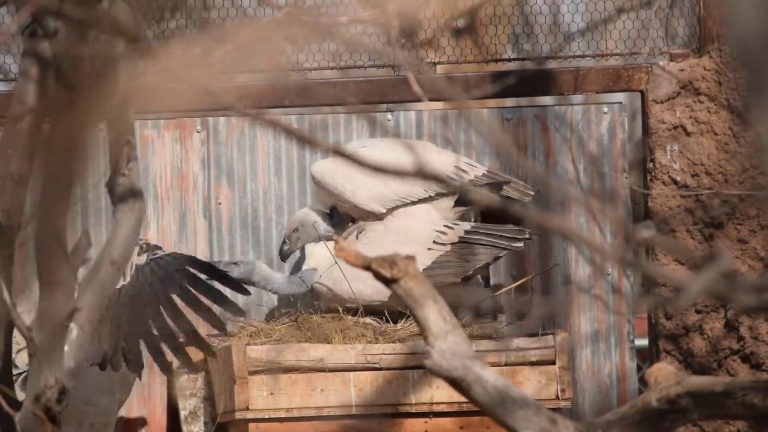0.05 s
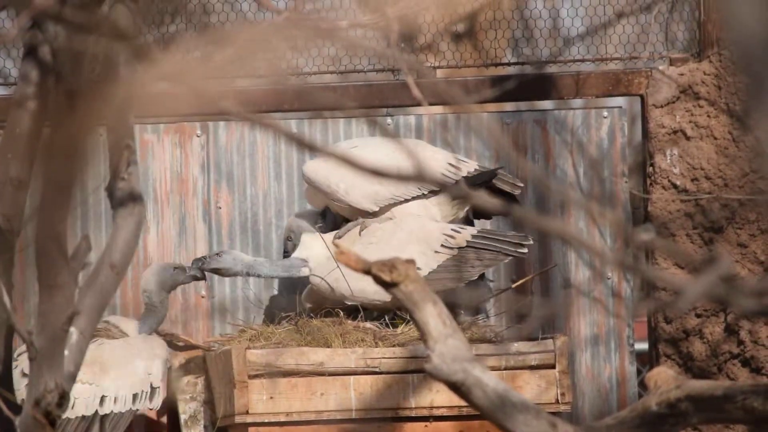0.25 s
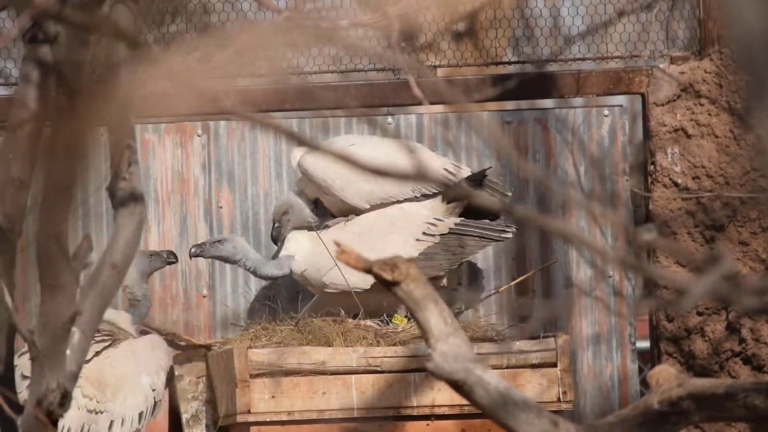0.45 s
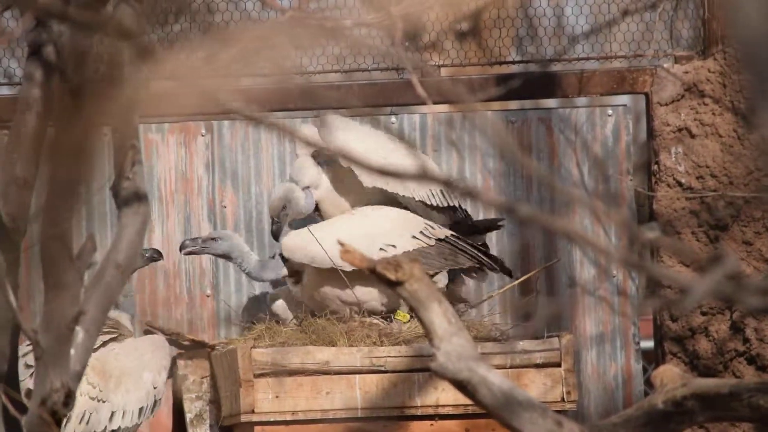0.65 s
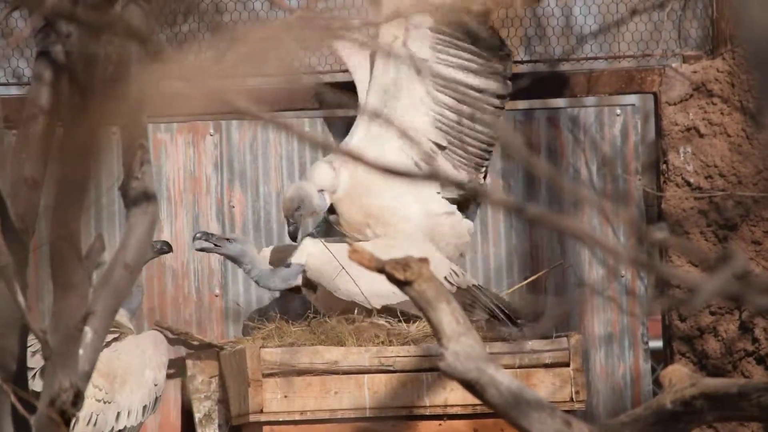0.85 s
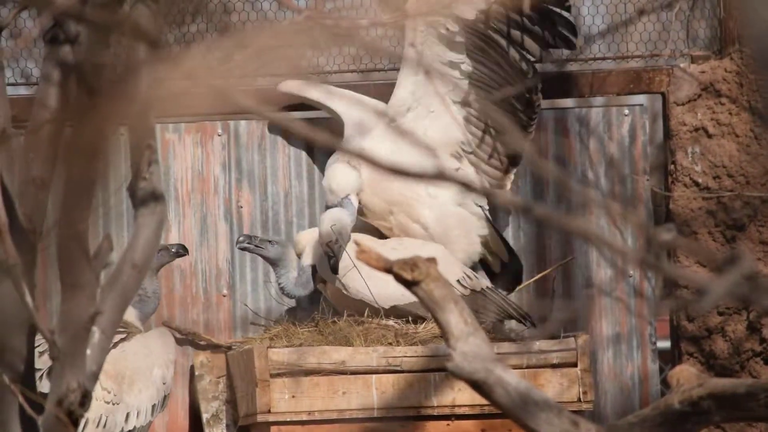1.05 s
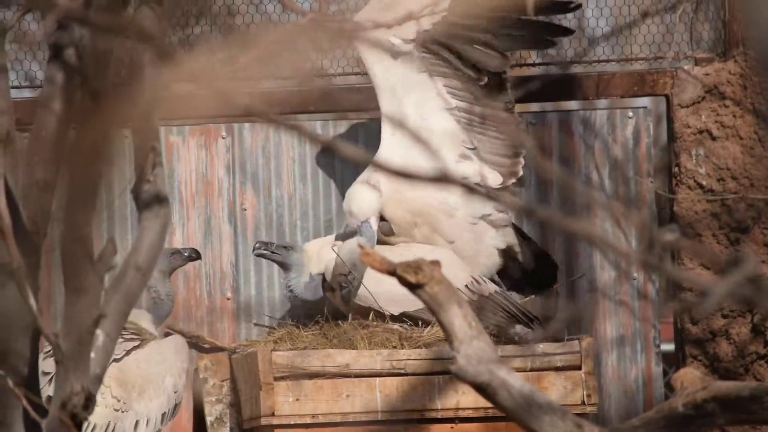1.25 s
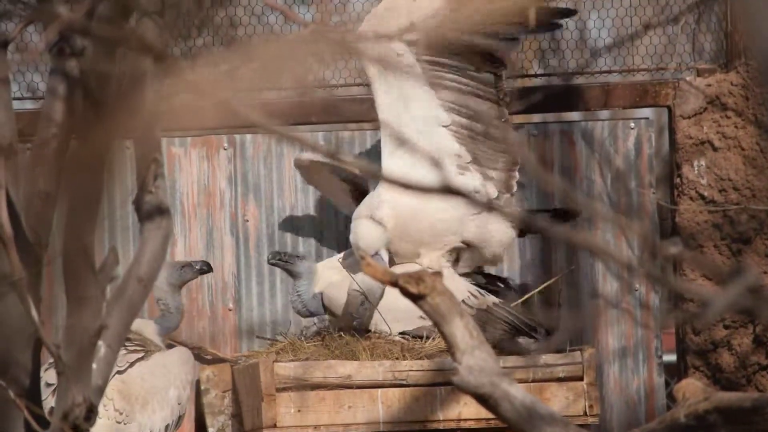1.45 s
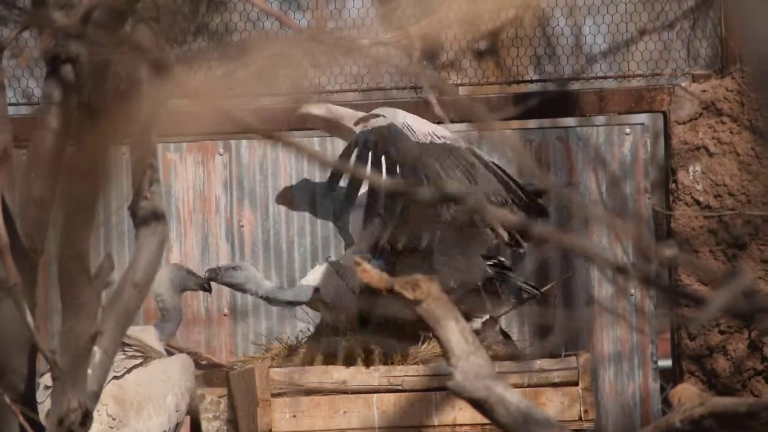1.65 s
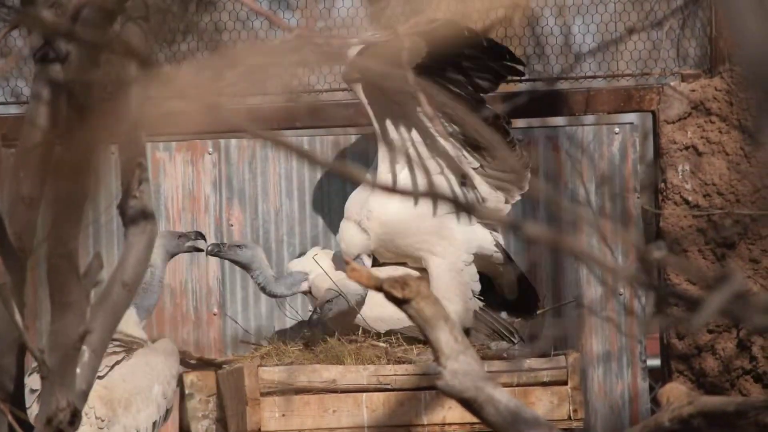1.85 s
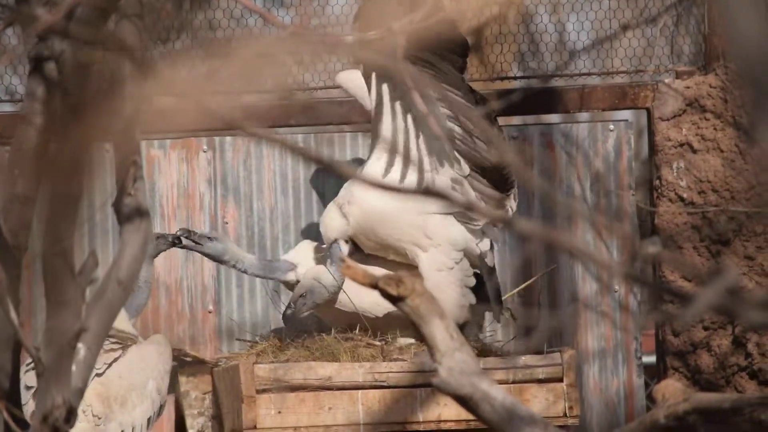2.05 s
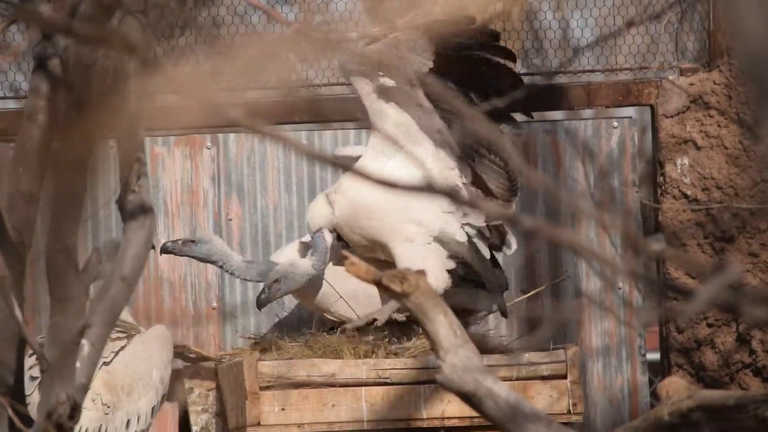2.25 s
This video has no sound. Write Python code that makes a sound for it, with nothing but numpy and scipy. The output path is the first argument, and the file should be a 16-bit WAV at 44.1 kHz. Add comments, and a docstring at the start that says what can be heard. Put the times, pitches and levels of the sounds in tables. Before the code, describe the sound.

Vultures give harsh, hoarse, hissing calls, with faint wing swishes and small birds chirping.

```python
"""Vultures squabbling in an aviary

Six hoarse calls from a nest box: ragged airflow through throat resonances, with hiss and wavering
whistles on top and short squeals where the voice catches a clear pitch. Wings swish, small birds
chirp all around, and a sheet-metal wall answers over a low outdoor rumble."""
import sys
import numpy as np
from scipy import signal
from scipy.fft import rfft, irfft, next_fast_len
from scipy.io import wavfile
from scipy.ndimage import uniform_filter1d, map_coordinates

SR = 44100
rng = np.random.default_rng(int(sys.argv[2]) if len(sys.argv) > 2 else 0)


def bounce(signal):
    """Save signal as a 16-bit WAV file at the path given by the first command-line argument."""
    frames = np.transpose(np.atleast_2d(signal))
    limited = np.clip(frames, -1, 1)
    pcm = np.round(limited * 32767).astype(np.int16)
    wavfile.write(sys.argv[1], SR, pcm)


N = 101429
FLUTTER_HZ, TRILL_HZ = 153.8, 300  # random modulation rates


def amp(db):
    """dB to gain."""
    return 10 ** (np.asarray(db) / 20)


def unit(x):
    """Scale to rms 1."""
    return x / np.sqrt(np.mean(x ** 2) + 1e-20)


def along(points, hz):
    """Interpolate (f/Hz, value) points on a log axis."""
    f, v = np.transpose(points)
    return np.interp(np.log(hz + 1), np.log(f + 1), v)


def clock():
    """Sample times in s."""
    return np.arange(N) / SR


def phase_of(hz):
    """Running phase in rad."""
    return 2 * np.pi * np.cumsum(hz) / SR


def wobble(hz, size):
    """Smooth random curve, hz knots per second."""
    return map_coordinates(rng.standard_normal(2048), [np.arange(size) * hz / SR], mode="mirror")


def filtered(x, response):
    """Apply the gain response(f/Hz)."""
    m = next_fast_len(N + SR // 4)
    return irfft(rfft(x, m) * response(np.fft.rfftfreq(m, 1 / SR)), m)[..., :N]


def noise(spectrum, patchy_db=3.2):
    """Stereo noise, rms 1, in patches of random gain; wider towards the treble."""
    # stereo width: f/Hz, side over mid/dB
    width = [(100, -33.5), (700, -17), (1500, -17), (4000, -8.5), (9000, -3.5)]
    bins = signal.stft(rng.standard_normal((2, N)), nperseg=512)[2]
    patches = uniform_filter1d(rng.standard_normal(bins.shape[1:]), size=3, axis=0)
    patches = unit(uniform_filter1d(patches, size=7, axis=1))
    mid, side = signal.istft(bins * amp(patchy_db * patches), nperseg=512)[1][:, :N]
    mid = filtered(mid, lambda hz: amp(along(spectrum, hz)))
    side = filtered(side, lambda hz: amp(along(spectrum, hz) + along(width, hz)))
    return unit(np.array([mid + side, mid - side]))


def add(out, start_s, x):
    """Mix x into out at start_s."""
    i = round(start_s * SR)
    x = x[max(-i, 0):max(N - i, 0)]
    out[max(i, 0):][:len(x)] += x


def wheezes(jitter=.005, shimmer_db=2.2):
    """Pinched, shaky whistle heard by its overtones; the pitch arches as it swells."""
    # wheezes: t/s, length/s, fundamental/Hz, level/dB, 5th re 3rd harmonic/dB, pitch arch/ratio
    notes = [(-0.015, 0.06, 1681, -39.5, -49, .22), (.036, 0.025, 1635, -44, -40, 0.13),
             (0.594, 0.091, 1643, -37, -18, 0.0516), (1.649, 0.059, 1630, -44, -12, 0.051)]
    out = np.zeros(N)
    for start_s, length_s, hz, db, upper_db, arch in notes:
        n = int(length_s * SR)
        progress = np.linspace(0, 1, n)
        bend = 1 - arch * (progress - .62) ** 2
        swell = np.abs(np.sin(np.pi * progress ** 1.3)) ** .8
        phase = phase_of(hz * (bend + jitter * wobble(282, n)))
        partials = [(2, -9), (3, 0), (5, upper_db), (6, upper_db - 7), (8, upper_db - 21)]
        tone = sum(amp(db + rel_db + shimmer_db * wobble(FLUTTER_HZ, n)) * np.sin(k * phase)
                   for k, rel_db in partials)
        add(out, start_s, 2 * swell * tone)
    return out


def squeals(jitter=.045, swell_db=6, shimmer_db=6, edge_s=.0048):
    """The voice catches a pitch and swells; roughness shakes pitch and level."""
    # squeals: t/s, length/s, first f/Hz, last f/Hz, level/dB, 3rd harmonic/dB, roughness/0-1
    notes = [(-0.01, 0.05, 931, 902, -37.5, -12, 0.42), (-0.01, 0.05, 1128, 1215, -43, -27, 0.53),
             (-0.01, 0.037, 1850, 1815, -38, -18, 0.22), (-0.01, 0.06, 1480, 1463, -41, -35, 0.75),
             (0.185, 0.036, 1402, 1318, -27, -45, .5), (0.21, 0.054, 1400, 1425, -21, -35, 0.08),
             (0.232, 0.068, 1569, 1640, -29, -30, 0.25), (0.522, 0.011, 1204, 1190, -35.5, -25, 0.65),
             (0.561, .02, 1252, 1325, -33, -15, 0.38), (0.302, 0.038, 1480, 1541, -24.5, -42, 0.06),
             (0.312, 0.055, 936, 952, -28.5, -40, 0.2), (0.365, .112, 957, 957, -39, -32, 0),
             (0.615, 0.053, 1624, 1646, -27, -38, 0), (.648, 0.074, 1910, 2180, -38, -42, 0.25),
             (0.659, 0.118, 1640, 1672, -28.5, -43, 0), (0.676, 0.018, 1649, 1670, -16, -51, 0),
             (0.991, 0.023, 1277, 1286, -32.5, -36, 0.08), (1.036, 0.026, 1363, 1380, -27, -41, 0.34),
             (1.0895, 0.01, 1440, 1500, -17.5, -38, 0), (1.118, 0.025, 1533, 1532, -13.5, -43, 0),
             (1.144, 0.012, 1510, 1580, -17.5, -41, 0.07), (1.154, 0.0059, 1554, 1510, -10, -44, 0),
             (1.175, 0.0059, 1540, 1570, -16, -38, 0.3), (1.349, 0.032, 1293, 1349, -27, -27, 0.48),
             (1.35, 0.029, 1012, 992, -32, -28, 0.2), (1.516, 0.018, 1187, 1280, -38.5, -28, 0.54),
             (1.566, 0.013, 1220, 1260, -34.5, -25, 0.4), (1.612, 0.039, 1297, 1429, -28.5, -18, 0.4),
             (1.662, 0.041, 905, 917, -37, -27, 0.13), (1.871, 0.027, 1447, 1318, -29.5, -18, 0.13),
             (1.706, 0.093, 1605, 1640, -28.5, -42, 0.18), (1.745, 0.036, 2050, 2205, -34.5, -42, .2),
             (1.928, 0.071, 1622, 1624, -21, -46, 0.05), (1.981, 0.0057, 1560, 1560, -24, -39, 0.2),
             (2.166, 0.021, 1027, 1046, -36.5, -25, 0)]
    out = np.zeros(N)
    for start_s, length_s, first_hz, last_hz, db, third_db, rough in notes:
        n = int(length_s * SR)
        t = np.arange(n) / SR
        phase = phase_of(np.linspace(first_hz, last_hz, n) * (1 + jitter * rough * wobble(286, n)))
        partials = [(1, 0), (2, -26.5), (3, third_db), (5, third_db - 28)]
        tone = sum(amp(rel_db) * np.sin(k * phase) for k, rel_db in partials)
        gate = np.sin(np.pi / 2 * np.clip(np.minimum(t, t[::-1]) / edge_s, 0, 1)) ** 2
        level_db = db + swell_db * np.linspace(-.5, .5, n) + shimmer_db * rough * wobble(FLUTTER_HZ, n)
        add(out, start_s, np.sqrt(2) * tone * gate * amp(level_db))
    return out


def rumble(level_db=-40.5):
    """Outdoor background: low rumble and broad noise."""
    # background spectrum: f/Hz, relative level/dB
    spectrum = [(25, -25), (50, -22), (85, -8.5), (130, 0), (160, -5), (220, 4), (270, 1), (340, 5),
                (480, -1.5), (750, 0), (1300, 6), (2200, 0), (3600, 3.5), (4700, -0.5), (6200, -19),
                (10000, -29.5), (15500, -39)]
    return amp(level_db) * noise(spectrum, patchy_db=2)


def chirp(length_s, contour_hz, waver=.022, trill_db=3.2):
    """Raspy whistle curving through three pitches; a thin octave joins below 6 kHz."""
    n = int(length_s * SR)
    progress = np.linspace(0, 1, n)
    arch_hz = np.polyval(np.polyfit([0, .5, 1], contour_hz, 2), progress)
    hz = arch_hz * (1 + waver * wobble(TRILL_HZ, n))
    phase = phase_of(hz)
    tone = np.sin(phase) + amp(-21) * (hz < 6000) * np.sin(2 * phase)
    swell = np.abs(np.sin(np.pi * progress)) ** .5
    return unit(tone * swell * amp(trill_db * wobble(TRILL_HZ, n)))


def flock(per_s=90, centre_hz=3703, base_db=-51.5, spread=.21, sweep=.1684, length_s=.035):
    """Chatter of random chirps around one pitch; flares up and subsides."""
    # flock activity: t/s, gain/dB
    bustle = [(.1, -11), (.17, 4), (.92, -6), (1.01, -6), (1.1, -3), (1.95, -0.5), (2.2, -3)]
    out = np.zeros(N)
    draws = rng.uniform(-1, 1, (int(per_s * N / SR), 5))
    for k, (offset, first, pitch, last, size) in enumerate(draws):
        contour_hz = centre_hz * np.exp(spread * pitch + sweep * np.array([first - .5, 0, last - .5]))
        add(out, (k + offset) / per_s, amp(base_db + 5.9 * size) * chirp(length_s, contour_hz))
    return out * amp(np.interp(clock(), *np.transpose(bustle)))


def small_birds(second_voice_db=-10):
    """Two-voiced chirps; the second voice is late and detuned."""
    # chirps: t/s, length/s, first f/Hz, middle f/Hz, last f/Hz, level/dB
    chirps = [(0.148, .042, 3236, 3890, 3160, -39), (0.176, 0.042, 5270, 5940, 7500, -48.5),
              (0.205, .03, 3890, 4630, 3425, -34.5), (0.229, 0.033, 3970, 4320, 3400, -46),
              (0.267, .035, 3430, 4280, 4140, -39), (0.387, .03, 6060, 6640, 7300, -65),
              (0.404, 0.018, 8900, 8600, 7900, -65), (0.432, 0.023, 7360, 7130, 6440, -58.5),
              (0.402, 0.043, 3950, 4910, 5300, -49.5), (0.424, 0.035, 4020, 3560, 3180, -48.5),
              (0.512, 0.05, 3240, 3960, 4140, -48), (.555, 0.028, 3960, 3500, 3670, -48.5),
              (0.628, .065, 6680, 5760, 3830, -51.5), (0.721, .045, 4230, 3760, 3090, -36),
              (0.771, 0.05, 5660, 5920, 5300, -48), (0.844, .04, 3180, 3400, 4270, -40),
              (0.851, 0.018, 6260, 7300, 10700, -50.5), (0.89, 0.054, 7800, 7150, 6300, -63),
              (0.87, 0.068, 3454, 3870, 3350, -43), (1.083, 0.021, 6260, 7600, 8700, -59),
              (1.084, .022, 3300, 4210, 5350, -54), (1.099, 0.05, 4420, 4020, 3860, -41.5),
              (1.222, 0.052, 3870, 3647, 3110, -39), (1.253, 0.019, 6800, 6800, 6760, -55.5),
              (1.293, .03, 4290, 4760, 5360, -42), (1.573, 0.022, 5640, 6000, 6120, -51),
              (1.601, 0.045, 3790, 3750, 2970, -34.5), (1.74, .045, 5150, 5380, 5340, -43),
              (1.768, 0.038, 4600, 4340, 4250, -43), (1.818, .03, 4380, 4870, 4930, -46.5),
              (1.87, .02, 6150, 8140, 9200, -60), (1.914, .035, 4040, 4166, 3180, -37.5),
              (2.088, 0.061, 2707, 2990, 2630, -44), (2.22, .014, 5860, 5660, 5130, -50),
              (2.269, .04, 3780, 4630, 4280, -43.5)]
    out = np.zeros(N)
    for start_s, length_s, *contour_hz, db in chirps:
        add(out, start_s, amp(db) * chirp(length_s, contour_hz))
        lag_s = rng.uniform(0, length_s / 2)
        detuned_hz = rng.uniform(.8, 1.05, 3) * contour_hz
        add(out, start_s + lag_s, amp(db + second_voice_db) * chirp(length_s, detuned_hz))
    return out


def wall_echo(x, side_db=-11.5):
    """Short, narrow echo of the enclosure and its sheet-metal wall."""
    # echo decay: f/Hz, T60/s
    decay = [(200, 0.17), (1500, 0.32), (4000, 0.37), (12000, 0.14)]
    hz, t, bins = signal.stft(rng.standard_normal((2, SR // 2)), SR, nperseg=256)
    tail = signal.istft(bins * amp(-60 * t / along(decay, hz)[:, None]), SR, nperseg=256)[1]
    mid, side = signal.fftconvolve(x[None], tail / np.linalg.norm(tail[0]), axes=1)[:, :N]
    side *= amp(side_db)
    return np.array([mid + side, mid - side])


def resonance(puffs, hz, width_hz, tuning):
    """Puffs of air ring a steep resonance; level held steady, pitch scaled by tuning."""
    air = puffs * rng.standard_normal(len(puffs))
    b, a = signal.iirpeak(hz, hz / width_hz, SR)
    ring = signal.lfilter(b, a, signal.lfilter(b, a, air))
    power = uniform_filter1d(uniform_filter1d(ring ** 2, size=900), size=500)
    steady = ring / np.sqrt(np.abs(power) + 1e-12)
    return map_coordinates(steady, [np.cumsum(tuning)], mode="mirror")


def buzz(ring):
    """Overtones that follow a resonance's unsteady pitch."""
    # throat buzz: harmonic number, relative level/dB
    overtones = [(3, -31.5), (6, -43.5), (8, -48.5)]
    analytic = signal.hilbert(ring)
    return sum(amp(db) * np.abs(analytic) * np.cos(k * np.angle(analytic)) for k, db in overtones)


def rasps(fade_db_per_s=900, onset_sag=.05, tighten_s=.025, flutter_db=-.5, twin_db=-.5):
    """Ragged puffs ring the throat, which tightens up into tune. Returns voice, airflow envelope."""
    # resonance envelopes, one list per call: t/s, main level/dB, middle level/dB, low level/dB
    calls = [
        [(0.235, -29.5, -36.5, -50), (0.255, -26, -41.5, -38.5), (0.291, -24, -28.5, -32.5),
         (0.319, -18.5, -22, -27.5), (0.339, -19, -27.5, -32.5), (0.479, -42.5, -44, -55), (0.5, -36, -44, -53)],
        [(0.675, -34, -27, -47), (0.699, -20, -26.5, -28), (0.787, -26.5, -38.5, -40.5),
         (0.867, -34.5, -28, -38.5), (0.921, -33, -44, -59), (0.939, -52, -41, -78), (0.97, -38, -55, -69)],
        [(1.062, -27, -27, -43), (1.144, -20.5, -44, -30.5), (1.174, -18, -26, -32.5), (1.228, -28.5, -44, -55),
         (1.27, -39, -49, -65), (1.3, -36, -64, -59), (1.32, -52, -52, -67)],
        [(1.356, -32, -34, -51), (1.396, -24.5, -20, -31), (1.408, -29.5, -27, -44), (1.448, -27.5, -28.5, -30),
         (1.466, -42, -57, -43), (1.486, -36, -30, -48), (1.51, -49, -45, -64)],
        [(1.66, -29, -31, -47), (1.682, -25.5, -45.5, -35), (1.718, -20, -16.5, -28), (1.746, -17, -42, -29.5),
         (1.786, -23, -27.5, -31.5), (1.826, -28.5, -28, -47), (1.88, -32.5, -30, -57)],
        [(1.9, -22.5, -31, -42.5), (1.954, -19.5, -35, -32), (1.998, -18, -30, -27.5), (2.106, -37.5, -57, -72),
         (2.152, -41.5, -75, -56), (2.174, -35, -65, -46), (2.24, -73, -79, -63)],
    ]
    # throat per call: main, twin, middle, low, overtone f/Hz; overtone level/dB, airflow level/dB
    throats = [(1513, 1640, 1327, 1010, 1884, -8.5, -32.5), (1648, 1735, 1354, 1051, 2080, -9, -34),
               (1539, 1675, 1390, 1045, 2035, -12.5, -33), (1582, 1615, 1316, 1004, 1400, -33, -37),
               (1610, 1750, 1363, 1047, 2170, -12.5, -32), (1501, 1658, 1310, 1040, 1960, -12.5, -35.5)]
    widths_hz = (80, 115, 140, 105, 200)  # main, twin, middle, low, overtone
    trims_db = (-3.5, -4, -3)  # main, middle, low
    voice, airflow = np.zeros(N), np.zeros(N)
    for rows, (*centres_hz, over_db, air_db) in zip(calls, throats):
        knots_s, *levels_db = np.transpose(rows)
        t = np.arange(knots_s[0] - .05, knots_s[-1] + .05, 1 / SR)
        fade_db = fade_db_per_s * np.abs(t - np.clip(t, knots_s[0], knots_s[-1]))
        main_gain, middle_gain, low_gain = [amp(np.interp(t, knots_s, db) + trim_db - fade_db)
                                            for db, trim_db in zip(levels_db, trims_db)]
        puffs = unit(amp(flutter_db * wobble(FLUTTER_HZ, len(t))))
        tuning = 1 - onset_sag * np.exp(-np.maximum(t - knots_s[0], 0) / tighten_s)
        main, twin, middle, low, over = [resonance(puffs, hz, width_hz, tuning)
                                         for hz, width_hz in zip(centres_hz, widths_hz)]
        upper = unit(main + buzz(main) + amp(twin_db) * twin + amp(over_db) * over)
        throat = main_gain * upper + middle_gain * middle
        add(voice, t[0], throat * unit(puffs ** .2) + low_gain * low)
        add(airflow, t[0], amp(air_db) * (main_gain / main_gain.max()) ** .74 * unit(puffs ** .5))
    return voice, airflow


def hiss(airflow, gain_db=-3.5):
    """Breath noise that follows the airflow."""
    # hiss spectrum: f/Hz, relative level/dB
    spectrum = [(200, -21), (500, -8.5), (750, -10), (1100, -14), (2400, 12), (2800, 6), (4200, -7),
                (5100, 1), (6200, -9.5), (7800, -34.5), (10000, -15), (12500, -35.5), (15500, -41.5)]
    return amp(gain_db) * airflow * noise(spectrum)


def whistles(airflow, gain_db=-2, wander=.07, wander_hz=38, jitter=.008, flicker_db=9):
    """Thin, wavering squeaks that come and go in the airflow."""
    # whistles: f/Hz, relative level/dB
    tones = [(3150, -2), (3600, 3), (4000, 4.5), (4500, 2), (5050, -3)]
    out = np.zeros(N)
    for hz, db in tones:
        pitch_hz = hz * (1 + wander * wobble(wander_hz, N) + jitter * wobble(TRILL_HZ, N))
        out += amp(db + flicker_db * np.tanh(wobble(wander_hz, N))) * np.sin(phase_of(pitch_hz))
    return amp(gain_db) * airflow * unit(out)


def grunts(jitter=.015):
    """Faint, unsteady chest hum under the calls."""
    # chest tones: t/s, length/s, f/Hz, level/dB
    notes = [(0.297, 0.076, 343, -53), (0.682, 0.042, 387, -52.5), (0.756, 0.04, 383.4, -49),
             (0.833, 0.052, 338, -52), (1.123, 0.12, 333.7, -53.5), (1.715, 0.14, 371, -52),
             (1.928, 0.19, 358, -54)]
    out = np.zeros(N)
    for start_s, length_s, hz, db in notes:
        n = int(length_s * SR)
        phase = phase_of(hz * (1 + jitter * wobble(73, n)))
        swell = np.sin(np.linspace(0, np.pi, n))
        add(out, start_s, 2 * amp(db) * swell * np.sin(phase))
    return out


def screeches(rasp_db=3):
    """Air forced through the narrowed throat rings high up in the harshest calls."""
    # shrill bursts: peak t/s, half length/s, level/dB
    bursts = [(0.692, 0.05, -56), (1.748, .045, -65.5)]
    # screech spectrum: f/Hz, relative level/dB
    spectrum = [(3000, -70), (8500, -25), (10300, 4), (11200, -13), (12100, -1), (13200, -18), (15500, -35)]
    t = clock()
    swell = sum(amp(db) * np.exp(-((t - peak_s) / half_s) ** 2) for peak_s, half_s, db in bursts)
    return swell * amp(rasp_db * wobble(FLUTTER_HZ, N)) * noise(spectrum)


def wings():
    """Each stroke is a swell of rustling feathers."""
    # wing strokes: peak t/s, rise/s, fall/s, level/dB
    strokes = [(.73, .035, 0.043, -32.5), (1.11, .04, 0.091, -71), (1.351, 0.017, 0.041, -35.5),
               (1.597, 0.016, 0.072, -36.5), (1.76, 0.037, 0.05, -57), (1.92, 0.047, 0.074, -42),
               (2.3, 0.027, .04, -36.5)]
    # feather spectrum: f/Hz, relative level/dB
    feathers = [(100, -23), (330, 1), (600, -16), (2000, 6.5), (4500, 15.5), (6500, -2.5), (8500, -18),
                (11000, -13), (15500, -38)]
    t = clock()
    swell = sum(amp(db) * np.exp(-((t - peak_s) / np.where(t < peak_s, rise_s, fall_s)) ** 2)
                for peak_s, rise_s, fall_s, db in strokes)
    return swell * amp(wobble(270, N)) * noise(feathers)


def scene(vulture_echo_db=-8.5, bird_echo_db=-5, pan_db=.26):
    """Vultures in front, small birds farther off, outdoor rumble behind."""
    voice, airflow = rasps()
    breath = hiss(airflow)
    vultures = voice + whistles(airflow) + squeals() + wheezes() + grunts()
    birds = flock() + small_birds()
    direct = vultures + birds + breath + screeches() + wings()
    echo = wall_echo(amp(vulture_echo_db) * vultures + amp(bird_echo_db) * birds)
    return (direct + echo) * amp([[pan_db], [-pan_db]]) + rumble()


def record(dry, whine_hz=15706, whine_db=-77, cutoff_hz=15800):
    """Very faint high whine, then a brick-wall low-pass."""
    whine = np.sqrt(2) * amp(whine_db) * np.sin(2 * np.pi * whine_hz * clock())
    return filtered(dry + whine, lambda hz: hz < cutoff_hz)


dry = scene()
out = record(dry)
bounce(out)
```